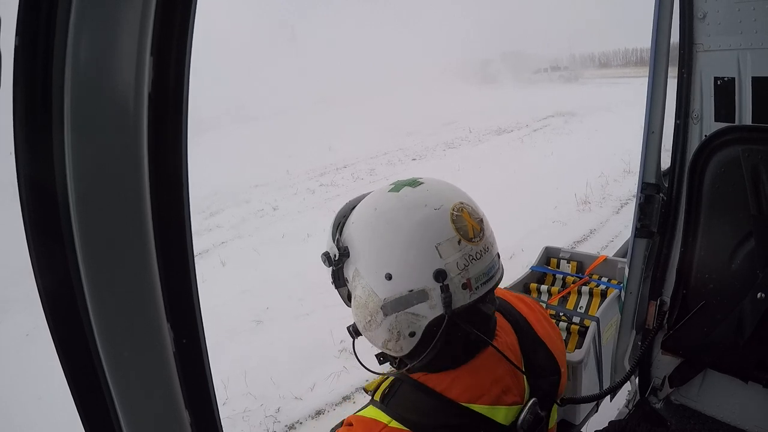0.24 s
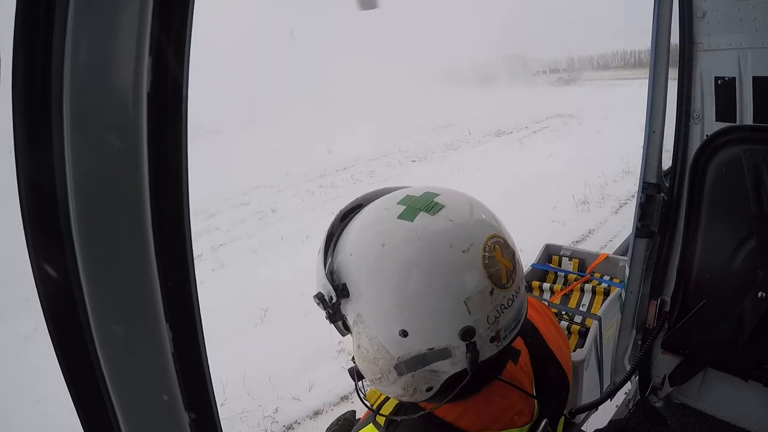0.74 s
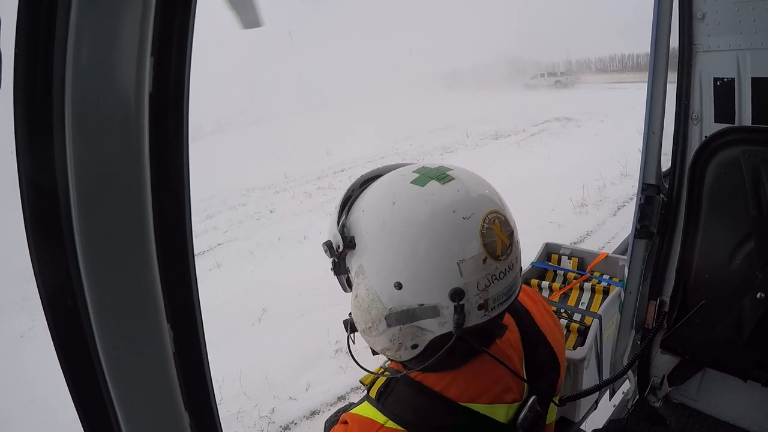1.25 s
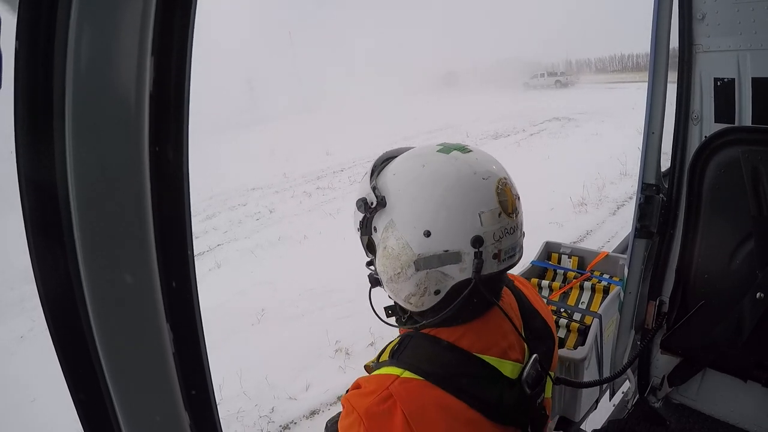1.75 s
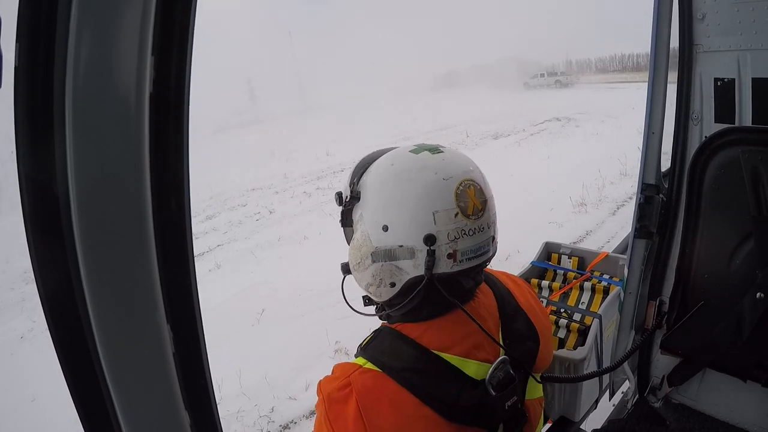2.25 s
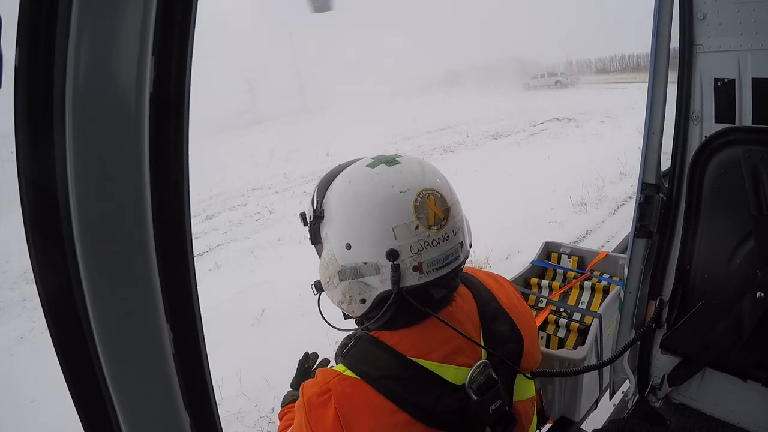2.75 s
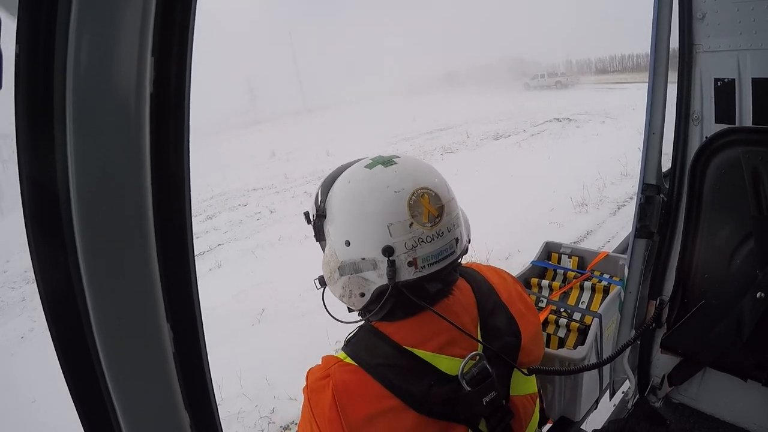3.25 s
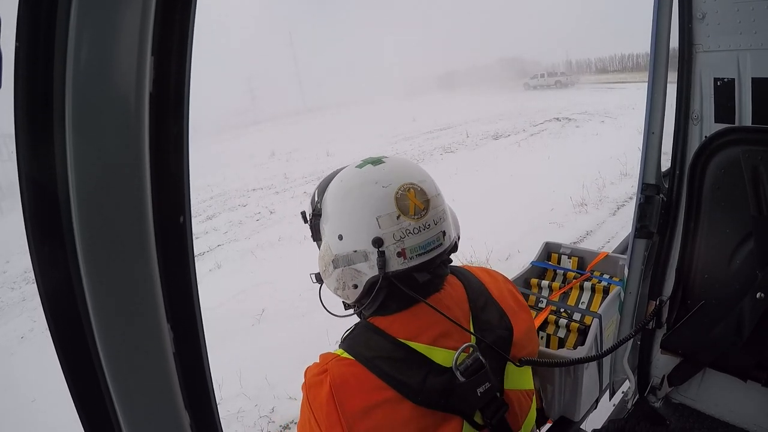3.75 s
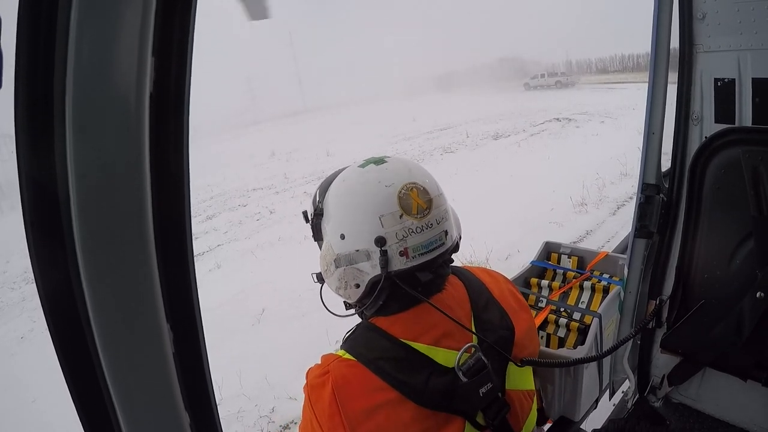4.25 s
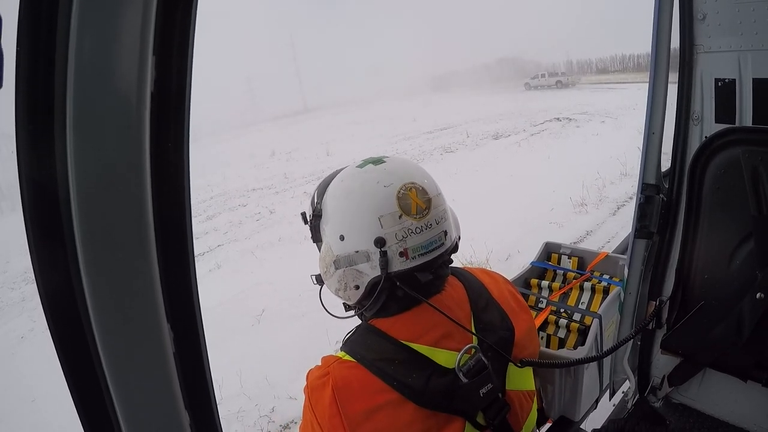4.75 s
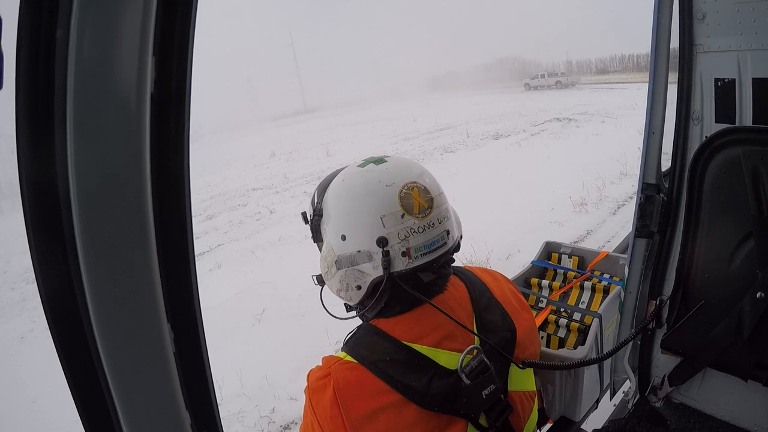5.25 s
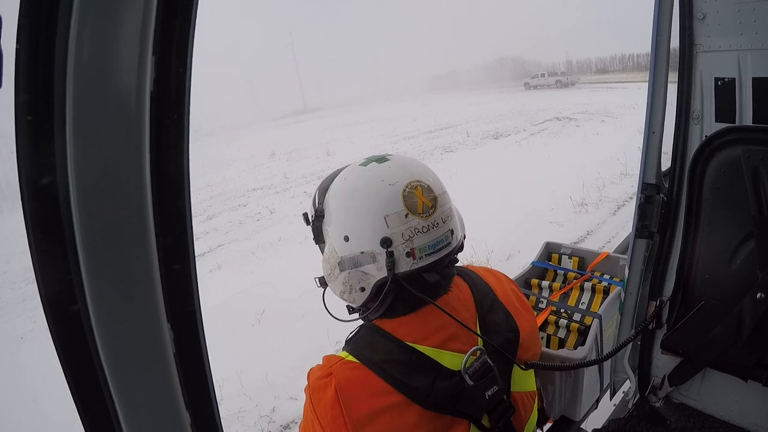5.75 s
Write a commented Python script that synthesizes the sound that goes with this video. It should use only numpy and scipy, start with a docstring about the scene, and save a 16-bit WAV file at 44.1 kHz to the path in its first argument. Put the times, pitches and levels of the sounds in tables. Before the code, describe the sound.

A helicopter idles down on open snow, heard by one microphone in the cabin at the open door. Straps and buckles tick, and a padded case shifts with dull hollow knocks near the start. The high compressor whine glides down and levels off by two seconds; gear tones sag slightly and throb. A brighter jet hiss with whistling and quick chirps then continues over constant roar and fluttering, deep air boom to the end.

```python
"""Helicopter idling down on snow

Heard inside the cabin at the open side door. The doorway booms in the downwash: a wavering low tone.
Gears, shaft and tail rotor hum as tones locked to the slowing rotor; the compressor whine sinks as the
engine is throttled back. A jet of shaped noise opens, with faint whistles and a chirping squeal in narrow
noise. Roar and downwash are coloured noise; a case shifts in ringing modes while buckles click."""
import sys
import numpy as np
from scipy import signal
from scipy.fft import rfft, irfft
from scipy.io import wavfile

SR = 44100
rng = np.random.default_rng(int(sys.argv[2]) if len(sys.argv) > 2 else 0)


def master_out(mix):
    """Clip the mix to full scale and print it as 16-bit PCM to the path in sys.argv[1]."""
    frames = np.transpose(np.atleast_2d(mix))
    ceiling = np.clip(frames, -1, 1)
    pcm = np.round(ceiling * 32767).astype(np.int16)
    wavfile.write(sys.argv[1], SR, pcm)


N = 265041

TEETH = 200   # main gear mesh cycles per rotor turn
TAIL_ORDER = 10.605   # tail blade passes per rotor turn


def from_db(db):
    """Decibels to gain."""
    return 10 ** (np.asarray(db) / 20)


def rms_one(x):
    """Scale to rms 1."""
    return x / np.sqrt(np.mean(np.abs(x) ** 2) + 1e-20)


def in_time(rows):
    """Draw each column of a curve table as straight lines, sample by sample."""
    s, *columns = np.transpose(rows)
    t = np.arange(N) / SR
    return [np.interp(t, s, column) for column in columns]


def drift(rate_hz):
    """Slow random wander of spread 1: noise through a double one-pole low-pass."""
    # made at an eighth of the sample rate; the filter settles before the part that is kept
    r = np.exp(-16 * np.pi * rate_hz / SR)
    noise = rng.standard_normal(N // 8 + 8002)
    slow = signal.lfilter([1], [1, -2 * r, r * r], noise)[8000:]
    return np.interp(np.arange(N) / 8, np.arange(len(slow)), rms_one(slow))


def tone(cycles, scatter, rate_hz):
    """A sine of rms 1, part of which is scattered by moving air into a narrow skirt."""
    share = np.clip(scatter, 0, 1)
    spread = (drift(rate_hz) + 1j * drift(rate_hz)) / np.sqrt(2)
    carrier = np.exp(2j * np.pi * (cycles + rng.random()))
    steady_and_scattered = np.sqrt(1 - share) + np.sqrt(share) * spread
    return np.sqrt(2) * (steady_and_scattered * carrier).real


def turbulence(spectrum, patchy_db, rate_hz):
    """Coloured noise of rms 1 in overlapping half-octave bands, each with a flicker of its own."""
    hz = np.maximum(np.fft.rfftfreq(N, 1 / SR), 1)
    point_hz, point_db = np.transpose(spectrum)
    colour = from_db(np.interp(np.log(hz), np.log(point_hz), point_db, left=-90, right=-90))
    noise = rfft(rng.standard_normal(N)) * colour
    place = 2 * np.log2(hz)   # in half octaves
    lowest, highest = np.floor(2 * np.log2(point_hz[0])), np.ceil(2 * np.log2(point_hz[-1]))
    out = np.zeros(N)
    for centre in np.arange(lowest, highest + 1):
        band = irfft(noise * np.maximum(1 - np.abs(place - centre), 0), N)
        out += band * from_db(patchy_db * drift(rate_hz))
    return rms_one(out)


def ring(force, hz, t60):
    """A decaying resonance: a unit click sets a sine of starting height 1 ringing."""
    r, w = from_db(-60 / (t60 * SR)), 2 * np.pi * hz / SR
    return signal.lfilter([0, np.sin(w)], [1, -2 * r * np.cos(w), r * r], force + 1e-18)


def doorway_boom():
    """The open doorway booms in the downwash: one low, slightly scattered tone, swelling and choking."""
    # Each row: time in seconds, level in dB.
    boom_level = [(0.0, -36), (0.1, -14), (0.17, -26), (0.23, -11), (0.3, -14.5), (0.35, -19), (0.42, -13),
                  (0.82, -16.5), (1.09, -12.5), (1.17, -17), (1.2, -13), (1.37, -11), (1.52, -19),
                  (1.67, -6.5), (1.92, -32), (1.97, -20), (2.34, -11), (2.43, -16.5), (2.69, -12.5),
                  (2.81, -30), (2.89, -12), (3.18, -12.5), (3.93, -17), (4.03, -17.5), (4.1, -11),
                  (4.2, -17), (4.38, -11), (4.57, -19), (4.7, -11.5), (5.14, -18), (5.24, -10.5),
                  (5.54, -16), (5.93, -9.5), (6.01, -15)]
    # Each row: time in seconds, pitch in Hz.
    boom_pitch = [(0.0, 34.1), (0.3, 38.3), (3.6, 38.19), (4.3, 37.23), (6.01, 37)]
    level_db, = in_time(boom_level)
    hz, = in_time(boom_pitch)
    return from_db(level_db) * tone(np.cumsum(hz) / SR, scatter=0.072, rate_hz=3.7)


def rotor_motion():
    """Integrate the main mesh pitch into the rotor's angle; gives pitch (Hz) and angle (turns)."""
    # Rotor speed. Each row: time in seconds, main gear mesh pitch in Hz.
    speed = [(0.0, 1305.8), (1.0, 1305.8), (1.4, 1301.6), (2.5, 1286.8), (3.0, 1284.2), (6.01, 1280.2)]
    mark_s, mark_turn = 2.5, .253   # the rotor's angle (turns) at one moment (s)
    mesh_hz, = in_time(speed)
    turns = np.cumsum(mesh_hz) / SR / TEETH
    return mesh_hz, turns - turns[round(mark_s * SR)] + mark_turn


def main_gear(turns):
    """Tooth mesh of the main gear, throbbing once a rotor turn from an eccentric ring gear."""
    # Loudest and most uneven while the rotor slows.
    # Each row: time in seconds, level in dB before the throb, throb depth 0-1.
    mesh = [(0.0, -44.5, 0), (0.95, -43.5, 0.1), (1.15, -35, .6), (1.8, -34, .65), (2.4, -37, 0.3),
            (3.5, -39, 0.07), (6.01, -43.5, 0)]
    throb_turn = 0.4   # angle at which the mesh is loudest (turns)
    level_db, throb = in_time(mesh)
    swell = 1 + np.clip(throb, 0, 1) * np.cos(2 * np.pi * (turns - throb_turn))
    return from_db(level_db) * swell * tone(TEETH * turns, scatter=0.0097, rate_hz=24.0)


def other_gears(mesh_hz, turns):
    """Four more meshes; how well each reaches the cabin depends on its pitch, so on rotor speed."""
    # One entry per mesh: cycles per rotor turn.
    gear_orders = [264.36, 260.04, 856.0, 886.7]
    # Main mesh pitches in Hz at which the levels below hold.
    gear_speeds_hz = [1281, 1284, 1288, 1298, 1306]
    # Each row: one mesh's levels in dB, a column for each of those pitches.
    gear_db = [(-35.5, -36.5, -44, -34, -33), (-39, -37, -40, -46, -47), (-53, -47, -40.5, -48, -43),
               (-45, -41.5, -45, -48, -52)]
    out = np.zeros(N)
    for order, levels_db in zip(gear_orders, gear_db):
        level_db = np.interp(mesh_hz, gear_speeds_hz, levels_db)
        out += from_db(level_db) * tone(order * turns, scatter=.3, rate_hz=12.0)
    return out


def shaft_hum(turns):
    """A shaft hums in step with the rotor, its level wavering."""
    # Each row: time in seconds, level in dB.
    shaft_level = [(0.0, -38), (1.3, -37), (2.1, -48), (2.45, -28), (3.3, -33), (3.6, -42), (3.95, -26),
                   (4.4, -31), (5.0, -41), (6.01, -44)]
    shaft_order = 17.78   # cycles per rotor turn
    level_db, = in_time(shaft_level)
    return from_db(level_db) * tone(shaft_order * turns, scatter=0.05, rate_hz=6.6)


def tail_rotor(turns):
    """Passing tail blades hum in harmonics, geared to the main rotor."""
    # One entry per harmonic, 1 to 5: level in dB.
    tail_db = [-31.5, -27.5, -47, -45.5, -47.5]
    out = np.zeros(N)
    for harmonic, level_db in enumerate(tail_db, start=1):
        out += from_db(level_db) * tone(harmonic * TAIL_ORDER * turns, scatter=0.15, rate_hz=4.0)
    return out


def airframe_hum(turns):
    """Rotor and airframe hum in low tones locked to the rotor."""
    # One entry per tone: cycles per rotor turn.
    shake_orders = [2.94, 4.33, 8, 9]
    # One entry per tone: level in dB.
    shake_db = [-39, -33, -42, -37]
    out = np.zeros(N)
    for order, level_db in zip(shake_orders, shake_db):
        out += from_db(level_db) * tone(order * turns, scatter=0.07, rate_hz=0.8)
    return out


def compressor_whine():
    """Compressor blade pass tone with a narrow and a wide skirt; also gives its pitch (Hz)."""
    # Each row: time in seconds, blade pass pitch in Hz, share scattered by turbulence 0-1.
    spool = [(0, 8760.0, .35), (.4, 8665.0, .35), (0.85, 8550.0, .35), (1.1, 8358.0, .35),
             (1.5, 7984.0, .35), (1.75, 7853.0, .35), (2, 7817.0, .35), (2.7, 7860.0, .35),
             (3.5, 7897.0, .55), (6.01, 7900.0, .85)]
    # Each row: time in seconds, level of the narrow part in dB.
    whine_level = [(0.0, -27), (0.45, -30), (1.65, -29), (1.74, -24.5), (1.83, -33.5), (1.96, -27),
                   (2.46, -27), (2.54, -30), (2.68, -22), (2.78, -28), (5.4, -32.5), (6.01, -31.5)]
    whine_hz, scattered = in_time(spool)
    level_db, = in_time(whine_level)
    blades = np.cumsum(whine_hz) / SR
    narrow = tone(blades, scattered, rate_hz=21.0)
    wide = from_db(-2.0) * tone(blades, scatter=1.0, rate_hz=100.0)
    return from_db(level_db) * (narrow + wide), whine_hz


def engine_roar(turns):
    """Turbulent engine noise, lightly chopped by each tail blade pass."""
    # Each row: frequency in Hz, relative density in dB per Hz.
    roar_colour = [(800, -15.5), (1200, -13), (1350, -10.5), (1550, 0), (1760, 0), (1950, -1), (2150, -1),
                   (2700, -2.5), (3300, -1), (3680, -9.5), (4830, -10), (7750, -15.5), (10000, -18.5),
                   (15300, -30)]
    # Each row: time in seconds, level in dB.
    roar_level = [(0.0, -26.5), (0.1, -25), (0.22, -22), (0.8, -22), (1.1, -22), (5.7, -22), (5.9, -19.5),
                  (6.01, -21)]
    chop = 1 + .09 * np.cos(2 * np.pi * TAIL_ORDER * turns)
    level_db, = in_time(roar_level)
    return chop * from_db(level_db) * turbulence(roar_colour, patchy_db=0.6, rate_hz=13.0)


def jet_opening(whine_hz):
    """Jet level (dB): the air jet opens as the compressor slows, with small random gusts."""
    open_hz, shut_hz = 8050, 8750   # compressor blade pass pitch
    open_db, shut_db, gust_db = -31.5, -37.5, 1
    return np.interp(whine_hz, [open_hz, shut_hz], [open_db, shut_db]) + gust_db * drift(4.5)


def jet_hiss(jet_db):
    """Broad hiss of the air jet: steady coloured noise following the jet level."""
    # Each row: frequency in Hz, relative density in dB per Hz.
    jet_colour = [(3300, -38), (4000, 4), (5000, -5), (5400, -20.5), (7000, -2), (9000, -21), (11500, -13),
                  (12400, -19), (14200, -12), (15500, -16)]
    hiss_db = -1.5   # against the jet level
    return from_db(jet_db + hiss_db) * turbulence(jet_colour, patchy_db=0.0, rate_hz=14.0)


def door_downwash():
    """Gusts of downwash at the door: mostly low coloured noise, its bands flickering."""
    # Each row: frequency in Hz, relative density in dB per Hz.
    downwash_colour = [(8.2, -36), (14, -21), (32, -2), (48, -4), (66, -16.5), (86, -14), (100, -10.5),
                       (139, -11), (158, -15.5), (184, -20), (338, -24), (386, -26.5), (736, -25.5),
                       (890, -36.5), (1120, -52)]
    # Each row: time in seconds, level in dB.
    gusts = [(0, -25), (.3, -23), (.55, -27), (.95, -22), (1.3, -25.5), (2.1, -24.5), (2.9, -24.5),
             (3.6, -24), (4.1, -26), (4.9, -25.5), (5.3, -23), (6.01, -26.5)]
    level_db, = in_time(gusts)
    return from_db(level_db) * turbulence(downwash_colour, patchy_db=1.0, rate_hz=5.0)


def buckle_clicks():
    """Buckles and straps click: single impulses, each ringing one bright short mode."""
    # Each row: time in seconds, level in dB, pitch in Hz.
    clicks = [(0.225, -11, 2200), (0.253, -10, 3200), (0.3242, -12, 2170), (0.3526, -12, 2390),
              (0.4678, -7.5, 2210), (0.646, -12, 3240), (1.0306, -12, 1770)]
    out = np.zeros(N)
    for s, level_db, hz in clicks:
        click = np.zeros(N)
        click[round(s * SR)] = from_db(level_db)
        out += ring(click, hz, t60=0.024)
    return out


def shifting_case():
    """Blows and uneven scraping on the cabin floor excite the modes of a hollow case."""
    # Each row: time in seconds, floor blow in dB, wall blow in dB.
    knocks = [(0.383, -31, -21), (0.425, -45, -10.5), (0.479, -32, -35), (0.982, -18, -52),
              (1.145, -29, -22), (1.512, -37, -22), (1.546, -28, -18.5)]
    # Scraping between the knocks. Each row: time in seconds, level in dB.
    scrape = [(0, -81), (.45, -35), (.58, -48), (.68, -42.5), (1.7, -48), (2.0, -81)]
    # Each row: mode pitch in Hz, t60 in seconds, gain from the floor in dB, gain from the wall in dB.
    case_modes = [(436, 0.057, -14, -32), (545, 0.11, 1, -6), (650, 0.055, -2, -10), (712, 0.046, -18, 1),
                  (753, 0.075, -16, -5), (960, 0.031, 0.5, -8), (1040, 0.042, -11, -34)]
    s, floor_db, wall_db = np.transpose(knocks)
    at = (s * SR).astype(int)
    floor, wall = np.zeros(N), np.zeros(N)
    floor[at] = from_db(floor_db)
    wall[at] = from_db(wall_db)
    wall = 0.0052 * ring(wall, 712, t60=0.059)   # the thin wall flexes first, so its note swells in
    scrape_db, = in_time(scrape)
    grains = rng.random(N) < 400.0 / SR   # about 400 tiny blows a second
    wall += rng.standard_normal(N) * grains * from_db(scrape_db)
    out = np.zeros(N)
    for hz, t60, low_db, high_db in case_modes:
        out += ring(from_db(low_db) * floor + from_db(high_db) * wall, hz, t60)
    padded = signal.butter(4, [330, 1130], "band", fs=SR, output="sos")   # padded contact
    return signal.sosfilt(padded, out)


def jet_whistles():
    """Jet whistles: fully scattered tones, slowly swelling and wandering in pitch."""
    # Each row: pitch in Hz, nominal width in Hz.
    whistle_pitches = [(4758, 85), (4680, 55), (4975, 40), (4420, 50), (5090, 25), (6225, 90), (9460, 200)]
    # One entry per whistle: level in dB against the jet level.
    whistle_db = [-1, -9.5, -8.5, -13, -12.5, -9.5, -13]
    out = np.zeros(N)
    for (hz, width_hz), level_db in zip(whistle_pitches, whistle_db):
        cycles = np.cumsum(hz + .12 * width_hz * drift(2.0)) / SR
        swell = from_db(level_db + 1.8 * drift(1.5))
        out += swell * tone(cycles, scatter=1, rate_hz=.6 * width_hz)
    return out


def rotor_head_squeal(turns):
    """Narrow noise from the rotor head flares and slides down at six angles a turn, varying in strength."""
    # Each row: angle in turns, centre pitch in Hz.
    chirps = [(.09, 13500), (.24, 14600), (.42, 15100), (.59, 14150), (.74, 14050), (.93, 13100)]
    # One entry per chirp: level in dB against the jet level.
    chirp_db = [-11.5, -6, -14.5, -11, -12, -13]
    length_turns, fall_hz = 0.035, 150.0   # spread of a flare; fall in pitch over one such spread
    out = np.zeros(N)
    for (angle, hz), level_db in zip(chirps, chirp_db):
        offset = ((turns - angle + .5) % 1 - .5) / length_turns   # from the flare's centre
        flare = np.exp(-.5 * offset ** 2) * from_db(level_db + 1.5 * drift(4.0))
        out += flare * tone(np.cumsum(hz - fall_hz * offset) / SR, scatter=.75, rate_hz=320.0)
    return out


def scene():
    """All sources summed at one microphone; whistles and squeal set in as the compressor slows."""
    mesh_hz, turns = rotor_motion()
    gears = main_gear(turns) + other_gears(mesh_hz, turns)
    drive_train = gears + shaft_hum(turns) + tail_rotor(turns) + airframe_hum(turns)
    whine, whine_hz = compressor_whine()
    jet_db = jet_opening(whine_hz)
    onset_hz, onset_width_hz = 8330, 70   # blade pass pitch at half onset, and how gradual it is
    onset = 1 / (1 + np.exp((whine_hz - onset_hz) / onset_width_hz))
    high = from_db(jet_db) * onset * (jet_whistles() + rotor_head_squeal(turns))
    engine = whine + engine_roar(turns) + jet_hiss(jet_db) + high
    cabin = shifting_case() + buckle_clicks()
    mix = doorway_boom() + drive_train + engine + door_downwash() + cabin
    return mix[None, :]


def record(dry):
    """Peaks are gently rounded by a tanh curve, then a steep low-pass cuts the top."""
    rounded = 2 * np.tanh(dry / 2)
    top_cut = signal.ellip(14, .5, 80, 15280, fs=SR, output="sos")   # ripple and stop dB, cutoff Hz
    return signal.sosfilt(top_cut, rounded)


dry = scene()
out = record(dry)
master_out(out)
```